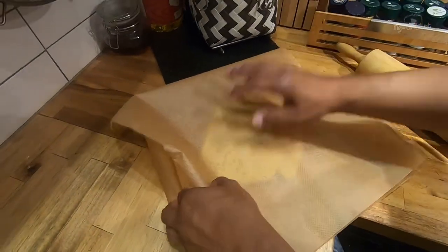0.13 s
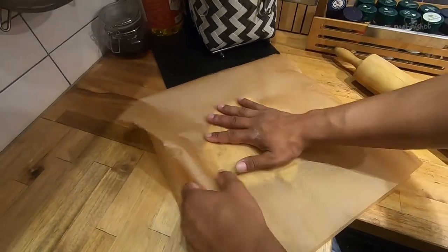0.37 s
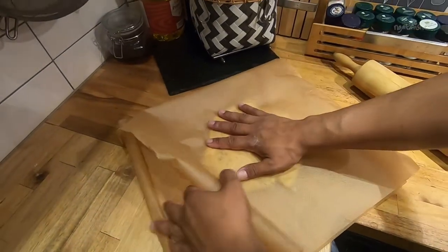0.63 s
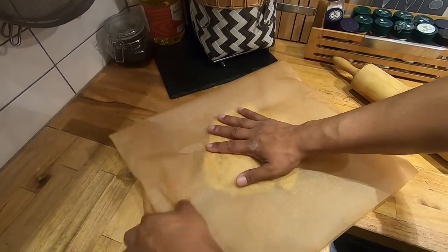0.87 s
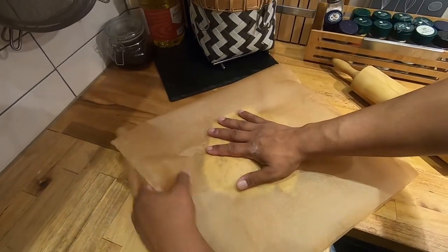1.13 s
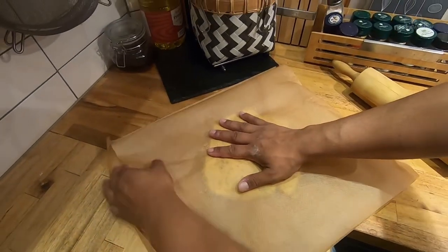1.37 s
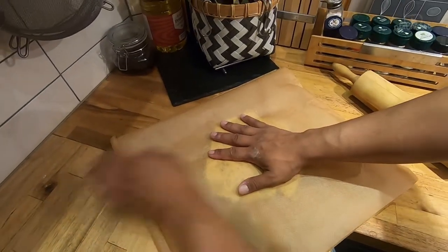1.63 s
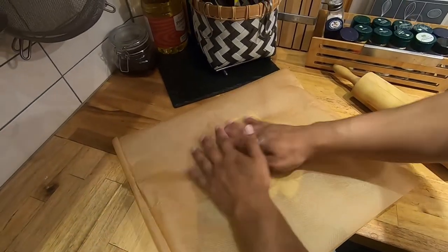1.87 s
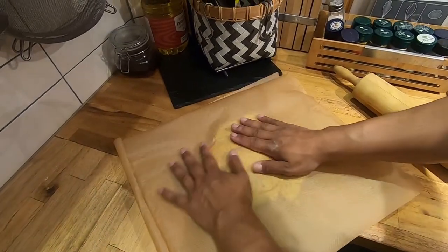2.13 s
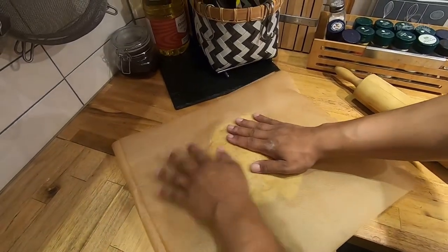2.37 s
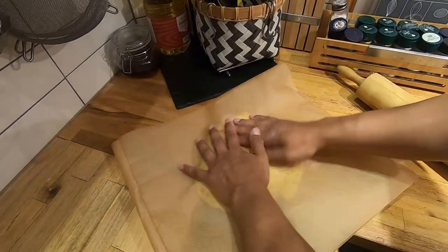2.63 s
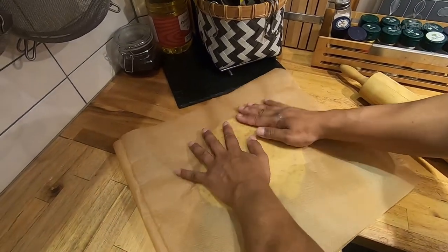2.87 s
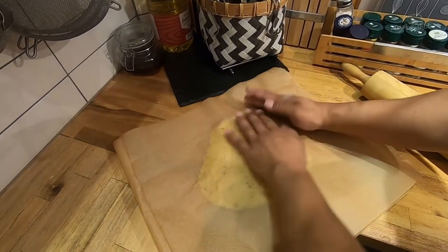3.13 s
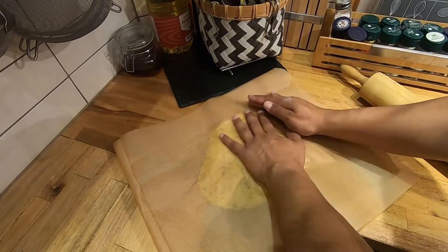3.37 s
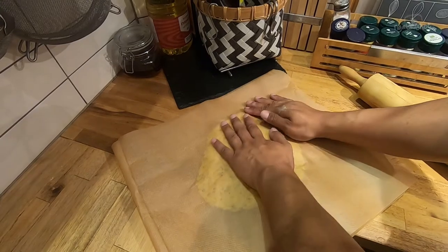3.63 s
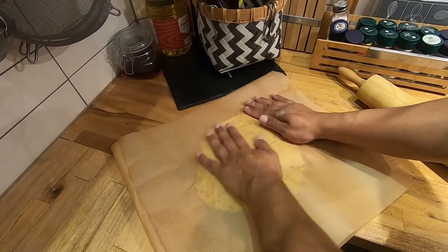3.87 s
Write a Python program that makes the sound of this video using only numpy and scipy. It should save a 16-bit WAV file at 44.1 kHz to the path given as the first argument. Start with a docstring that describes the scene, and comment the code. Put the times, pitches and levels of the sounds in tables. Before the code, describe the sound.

Hands pull and smooth crisp baking paper over dough on a wooden counter; bright snaps and hissing slides come first, then a short pause, a fresh burst and lighter crinkles, with faint thuds and low room hum.

```python
"""A crease snaps at once, close to the microphone, then parchment paper rustles as hands pull and
smooth it over dough on a wooden counter in a tiled kitchen. Dense tiny clicks of buckling and noise
for the sliding hiss share the paper's spectrum; louder creases ring briefly and set off flurries.
Soft thuds are decaying low tones. Behind them lie feedback-delay reverberation, a wavering sine hum
near 47 Hz and a faint room floor of shaped noise."""
import sys
import numpy as np
from scipy import signal
from scipy.fft import rfft, irfft, next_fast_len
from scipy.io import wavfile
from scipy.ndimage import uniform_filter1d

SR = 44100
rng = np.random.default_rng(int(sys.argv[2]) if len(sys.argv) > 2 else 0)


def linear_from_db(decibels):
    """Turn decibels (scalar or array-like) into linear amplitude factors; 0 gives 1."""
    return 10 ** (np.asarray(decibels, float) / 20)


def materialize(psi):
    """Save the field psi as 16-bit PCM at rate SR to the path in sys.argv[1].

    A 1-D psi becomes a single channel; in a 2-D psi each row is a channel.
    """
    bounded = np.clip(np.atleast_2d(psi).T, -1, 1)
    quanta = np.round(bounded * 32767).astype(np.int16)
    wavfile.write(sys.argv[1], SR, quanta)


N = 176400   # 4 s


def rms_one(x):
    """Scale to rms 1."""
    return x / np.sqrt(np.mean(x ** 2) + 1e-20)


def in_time(rows):
    """Columns of a curve over time, one value per sample."""
    times, *columns = np.transpose(rows)
    return [np.interp(np.arange(N) / SR, times, column) for column in columns]


def at_hz(points, hz):
    """Read a spectrum on a log frequency axis."""
    points = np.array(points)
    return np.interp(np.log(hz), np.log(points[:, 0]), points[:, 1])


def drift(rate_hz):
    """Slow chance of spread 1: noise through two equal low-pass poles, drawn at every 20th sample."""
    pole = np.exp(-40 * np.pi * rate_hz / SR)
    noise = rng.standard_normal(N // 20 + 2002)
    slow = signal.lfilter([1], [1, -2 * pole, pole * pole], noise)[2000:]
    return np.interp(np.arange(N) / 20, np.arange(len(slow)), rms_one(slow))


def resonate(x, hz, width_hz):
    """Two-pole resonance, gain 1 on top."""
    r = np.exp(-np.pi * width_hz / SR)
    poles = [1, -2 * r * np.cos(2 * np.pi * hz / SR), r * r]
    return signal.lfilter([(1 - r * r) / 2, 0, (r * r - 1) / 2], poles, x)


# How alike the left and right of the microphone are: (frequency [Hz], likeness [1 = identical])
STEREO_LIKENESS = [(60, 1), (130, 0.68), (290, 1), (640, 0.66), (1410, 0.23), (3100, 1), (6820, 0.037),
                   (15000, 0.01)]
# Balance of the stereo image: (frequency [Hz], left minus right [dB])
STEREO_BALANCE = [(60, 0.5), (130, 0.0), (290, -0.5), (640, -0.5), (1410, -0.5), (3100, 0.0), (6820, -1.0),
                  (15000, 3.0)]
TOP_SHARE = 0.61   # share of the brightness tilt that applies above 3500 Hz


def coloured(pairs, spectrum, tilt_db, patchy_db):
    """Half-octave bands dealt in turn from (mid, side) inputs, each with level, flicker and stereo image."""
    out, edges = 0, 25 * 2 ** np.arange(0, 9.6, .5)
    for k, (low, high) in enumerate(zip(edges, edges[1:])):
        band = signal.butter(2, [low, high], "band", fs=SR, output="sos")
        mid, side = signal.sosfilt(band, pairs[k % len(pairs)])
        side = side * np.std(mid) / np.std(side)
        hz = np.sqrt(low * high)
        alike = np.clip(at_hz(STEREO_LIKENESS, hz), -1, 1)
        lean_db = at_hz(STEREO_BALANCE, hz) / 2 * np.array([[1], [-1]])
        # the tilt is flat from 350 to 900 Hz and absent below
        tilt_share = TOP_SHARE if hz > 3500 else hz > 350
        bright_db = tilt_db * np.log2(max(hz, 900) / 3500) * tilt_share
        flicker_db = patchy_db * (.5 if hz > 7000 else 1) * drift(30.3)
        gain = linear_from_db(at_hz(spectrum, hz) + bright_db + flicker_db)
        stereo = np.sqrt(1 + alike) * mid + np.sqrt(1 - alike) * side * [[1], [-1]]
        out = out + gain * linear_from_db(lean_db) * stereo
    return rms_one(out)


# Spectrum of the room floor: (frequency [Hz], relative level per Hz [dB])
FLOOR_SPECTRUM = [(40, -23), (70, 0), (150, -11), (320, -4), (600, -10.5), (1100, -13), (3000, -18),
                  (7500, -24.5), (11000, -32), (15600, -48)]


def room_floor():
    """Faint stationary noise of the room, shaped in bands that flicker slightly."""
    return linear_from_db(-55) * coloured(rng.standard_normal((2, 2, N)), FLOOR_SPECTRUM, 0, 1.1)


# Swells of the hum at the microphone: (time [s], rms level before smoothing and drift [dB])
HUM_LEVEL = [(0, -44.5), (.12, -55), (.25, -67), (.35, -50), (.43, -55.5), (.62, -45.5), (.86, -65.5),
             (.97, -50), (1.07, -74), (1.17, -48), (1.27, -59), (1.47, -45.5), (1.57, -56.5), (1.66, -46.5),
             (1.84, -65.5), (1.94, -54), (2.19, -70), (2.47, -46), (2.8, -58), (2.95, -55.5), (3.55, -64),
             (4, -53)]
# Slow course of the hum's pitch: (time [s], centre frequency [Hz])
HUM_COURSE = [(0, 47), (.8, 50), (1.1, 44.5), (2.2, 45), (2.4, 49.5)]
HUM_WOBBLE_HZ, HUM_SIDE_DB, HUM_SMOOTH_S = 2, -15, .05


def hum():
    """A low sine that wavers in pitch, swells and fades, with a weak part opposite in left and right."""
    hz = in_time(HUM_COURSE)[0] + HUM_WOBBLE_HZ * drift(5.1)
    phase = 2 * np.pi * np.cumsum(hz) / SR
    level = linear_from_db(in_time(HUM_LEVEL)[0] + 2 * drift(10))
    level = uniform_filter1d(level, size=int(HUM_SMOOTH_S * SR))
    side = linear_from_db(HUM_SIDE_DB) * np.cos(phase + 2 * drift(1.5)) * [[1], [-1]]
    return np.sqrt(2) * level * (np.sin(phase) + side)


KITCHEN_T60_S, WALL_CUT_HZ = 0.32, 27000   # low-frequency decay time; losses grow towards this frequency


def kitchen(x):
    """Eight feedback delays a side with dull walls, evaluated on a frequency grid."""
    size = next_fast_len(N + SR)
    hz = np.arange(size // 2 + 1) * SR / size
    delays_s = rng.uniform(.008, 0.039, (2, 8))
    loss = np.sqrt(1 + (hz / WALL_CUT_HZ) ** 2)
    source = rfft(x.mean(axis=0), size)
    out = []
    for side in delays_s:
        loops = [linear_from_db(-60 * d * loss / KITCHEN_T60_S) * np.exp(-2j * np.pi * hz * d) for d in side]
        response = sum((-1) ** k * g / (1 - g) for k, g in enumerate(loops))
        out.append(irfft(source * response, size)[:N])
    return np.array(out)


# The hand bumps the counter through the dough:
# (time [s], level before onset and decay [dB], pitch [Hz])
COUNTER_BUMPS = [(0.304, -33.5, 167), (0.464, -38, 168), (1.328, -44.5, 266), (1.915, -42, 85),
                 (3.059, -43, 225), (3.347, -48.5, 148)]
KNOCK_T60_S, KNOCK_ATTACK_S = .16, .006


def knocks():
    """Soft low thuds of the wooden top: a decaying tone and a weaker one an octave below."""
    out, t = np.zeros(N + 9000), np.arange(9000) / SR
    for s, db, hz in COUNTER_BUMPS:
        shape = (1 - np.exp(-t / KNOCK_ATTACK_S)) * linear_from_db(db - 60 * t / KNOCK_T60_S)
        tone = np.sin(2 * np.pi * hz * t) + 0.54 * np.sin(np.pi * hz * t)
        i = int(s * SR)
        out[i:i + 9000] += shape * tone
    return out[:N]


# Single creases, close to the microphone, each followed by a dying flurry of clicks: (flurry start [s],
# snap level [dB], pitch [Hz], flurry level before FLURRY_DB [dB], flurry decay by 60 dB [s])
CREASE_SNAPS = [(0.0187, -18.5, 3150, -26, 0.16), (0.141, -32, 2480, -30.5, 0.041),
                (0.1621, -14, 2870, -14.5, 0.07), (0.2025, -19.5, 2630, -20.5, 0.066),
                (0.2428, -19.5, 2000, -21, 0.07), (0.249, -25, 2450, -14, 0.084),
                (0.2684, -29, 2980, -18, 0.039), (0.3014, -16, 2600, -12.5, 0.18),
                (0.3117, -15, 3040, -19, 0.098), (0.4346, -23, 1710, -22.5, 0.09),
                (0.4424, -27.5, 1540, -18, 0.18), (0.4534, -20, 2470, -18.5, 0.059),
                (0.519, -19, 3300, -16.5, 0.12), (0.6535, -11, 2980, -21.5, 0.088),
                (0.753, -13.5, 2830, -20, 0.078), (0.8705, -15.5, 3830, -16.5, 0.061),
                (1.1326, -20, 3900, -21, 0.095), (1.1482, -20, 3700, -14, 0.11),
                (1.241, -31, 3000, -13.5, 0.035), (1.6165, -35, 3530, -18.5, 0.09),
                (1.7716, -48, 7460, -32, 0.033), (1.8083, -24.5, 4170, -30, 0.038),
                (1.8596, -11, 3760, -22.5, 0.12), (1.8944, -11.5, 3200, -17, 0.11),
                (2.011, -16.5, 2950, -26, 0.07), (2.356, -23.5, 2980, -27.5, 0.071),
                (2.429, -22.5, 5000, -30, 0.062), (2.5515, -31, 3230, -30, 0.12),
                (2.5604, -26, 4070, -31, 0.059), (2.5731, -15, 3380, -21, 0.062),
                (2.6261, -17, 4400, -27, 0.04), (2.6433, -18, 3900, -22, 0.08),
                (2.6651, -16, 3400, -26, 0.05), (2.9084, -24, 3200, -26, 0.058),
                (2.9357, -21, 3960, -27, 0.093), (3.0326, -22, 3830, -30, 0.061),
                (3.0687, -22, 3100, -29, 0.045), (3.0815, -22.5, 2980, -19.5, 0.076),
                (3.167, -31, 4500, -23.5, 0.054), (3.2075, -15, 3100, -28, 0.07),
                (3.237, -22, 2700, -34, 0.054), (3.3155, -25, 6400, -31, 0.05),
                (3.3326, -24.5, 6660, -21.5, 0.083), (3.4146, -26, 3100, -27, 0.05),
                (3.4587, -26, 1500, -33, 0.099), (3.4685, -28, 3640, -31, 0.07),
                (3.5273, -30, 3180, -36, 0.048), (3.5542, -21, 2500, -35, 0.05),
                (3.5902, -17, 2700, -33, 0.1), (3.7481, -25, 2050, -36, 0.059),
                (3.7675, -24, 2700, -27, 0.066), (3.9445, -25, 2560, -33, 0.07),
                (3.9687, -27, 2250, -25.5, 0.049)]
# Returns off counter and wall: (nominal delay [s], level relative to the snap [dB])
COUNTER_WALL_ECHOES = [(.0013, -6), (.0024, -7), (.0068, -10), (.0084, -14)]
SNAP_DELAY_S = .0018   # from the start of the flurry to the envelope's peak
SNAP_LAG_SAMPLES = 0.45   # largest lag of the right side, before rounding to a sample
SNAP_CYCLES = 1.1   # cycles from start to peak
SNAP_OVERTONE, SNAP_OVERTONE_DB = 1.85, -11   # upper mode: frequency ratio and level
RATTLE_DB, RATTLE_T60_S, RATTLE_WIDTH = -19, .035, .45   # width as a share of the pitch


def snaps():
    """Each snap swells and dies within a few cycles, rattles on and comes back off counter and wall."""
    out, t = np.zeros((2, N + 4000)), np.arange(2400) / SR
    chance = rng.random((len(CREASE_SNAPS), 5))
    for (s, db, hz, _, _), u in zip(CREASE_SNAPS, chance):
        age = t * hz / SNAP_CYCLES
        turns = 2 * np.pi * (hz * t + u[0])
        tone = np.sin(turns) + linear_from_db(SNAP_OVERTONE_DB) * np.sin(SNAP_OVERTONE * turns)
        ring = tone * (age * np.exp(1 - age)) ** 2
        rattle = rms_one(resonate(rng.standard_normal((2, 2400)), hz, RATTLE_WIDTH * hz))
        rattle = rattle * linear_from_db(RATTLE_DB - 60 * t / RATTLE_T60_S)
        for ch in range(2):
            i = int((s + SNAP_DELAY_S - SNAP_CYCLES / hz) * SR + ch * SNAP_LAG_SAMPLES * u[0])
            side_rattle = rattle[0] + .5 * (1 - 2 * ch) * rattle[1]
            out[ch, i:i + 2400] += linear_from_db(db) * (ring + np.minimum(age, 1) * side_rattle)
            for (delay, echo_db), v in zip(COUNTER_WALL_ECHOES, u[1:]):
                j = i + int(delay * SR * (.95 + .1 * v + .02 * ch))
                out[ch, j:j + 2400] += linear_from_db(db + echo_db) * ring
    return out[:, :N]


# How hard the paper is worked, close to the microphone:
# (time [s], rustle level without flurries [dB], brightness [dB per octave])
PAPER_MOTION = [(0, -43, -4.5), (.03, -35.5, -3.5), (.08, -34, -2.5), (.13, -46, -3), (.16, -31.5, -3.5),
                (.23, -34.5, -2.5), (.29, -29.5, -2), (.36, -30.5, -2.5), (.42, -34, -3),
                (.49, -30.5, -2.5), (.53, -26.5, -3), (.58, -27, -1), (.69, -23, 0), (.73, -23, -0.5),
                (.79, -21.5, -0.5), (.86, -25, -2.5), (.92, -25.5, 2.5), (.96, -33, -0.5), (1.08, -29, 0.5),
                (1.11, -33.5, -0.5), (1.17, -26.5, 1), (1.21, -32.5, 1), (1.26, -25.5, -1),
                (1.35, -20, -1.5), (1.42, -24.5, 2), (1.5, -24, 2), (1.6, -38, 0.5), (1.64, -38.5, 1.5),
                (1.68, -45, -1), (1.74, -55, -1.5), (1.828, -45.5, -0.5), (1.842, -21.5, -0.5),
                (1.9, -22, 1.5), (1.96, -28, 0.5), (2.05, -32, 0.5), (2.19, -31.5, 3), (2.23, -34.5, -1),
                (2.32, -36.5, 0.5), (2.44, -42.5, 1), (2.545, -51.5, -2), (2.575, -29.5, 0),
                (2.64, -29, -0.5), (2.71, -30.5, -0.5), (2.81, -25.5, 1.5), (2.845, -35.5, -0.5),
                (2.9, -42, -2), (2.95, -41.5, 0), (3.02, -46.5, -3), (3.045, -31.5, -1.5), (3.13, -37, 4.5),
                (3.2, -36.5, -1.5), (3.25, -39, -0.5), (3.3, -48, 0), (3.35, -45.5, 1.5), (3.4, -54, 3.5),
                (3.45, -43.5, 1), (3.49, -43.5, 3), (3.52, -46, -1), (3.62, -42, -0.5),
                (3.685, -45.5, -1.5), (3.78, -37, 1), (3.9, -38, -0.5), (4, -34, 1)]
FLURRY_DB, FLURRY_ATTACK_S = -4.5, 0.001   # trim and onset of all flurries


def activity():
    """Rustle gain: the slow motion plus the flurry after each snap, summed as power."""
    power, t = linear_from_db(2 * in_time(PAPER_MOTION)[0]), np.arange(N) / SR
    for s, _, _, flurry_db, t60 in CREASE_SNAPS:
        i = int(s * SR)
        age = t[i:i + 12000] - s + 1e-4
        decay = linear_from_db(flurry_db + FLURRY_DB - 60 * age / max(t60, .005))
        power[i:i + 12000] += (decay * (1 - np.exp(-age / FLURRY_ATTACK_S))) ** 2
    return np.sqrt(power)


POPS_PER_S, POP_DB = 200, -12.5   # level relative to the rustle gain
POP_LOW_HZ, POP_HIGH_HZ, POP_WIDTH_HZ = 1450, 3860, 960   # width of the first of two resonances


def pops(gain, tilt_db):
    """Sparse middling creases ring briefly at one of eight pitches; brighter strokes favour the high ones."""
    sizes = linear_from_db(4.2 * np.minimum(rng.exponential(1, N), 3)) * rng.choice([-1, 1], N)
    sizes = sizes * (rng.random(N) < POPS_PER_S / SR)
    pitch_index = rng.integers(0, 8, N)
    pan_db = rng.normal(0, 4.3, N)   # left minus right
    sides = sizes * linear_from_db(pan_db * np.array([[.5], [-.5]]))
    rings = []
    for k, hz in enumerate(np.geomspace(POP_LOW_HZ, POP_HIGH_HZ, 8)):
        struck = resonate(sides * (pitch_index == k) + 1e-18, hz, POP_WIDTH_HZ)
        rings.append(resonate(struck, hz, 2 * POP_WIDTH_HZ) * linear_from_db(tilt_db * np.log2(hz / 3500)))
    return linear_from_db(POP_DB) * gain * rms_one(sum(rings))


# Colour of the sheet, heard close: (frequency [Hz], relative level per Hz [dB])
PAPER_SPECTRUM = [(59, -35), (100, -24), (156, -17.5), (197, -18), (287, -16.5), (669, -18.5), (1340, -8.5),
                  (1490, -8.5), (3130, -4), (8990, -7), (13400, -45.5), (15600, -80)]
GRAINS_PER_S, GRAIN_SPREAD_DB = 2500, 2.5   # buckling creases: rate at the median gain, spread of sizes
CLUMP_DB, CLUMP_PER_S = 3, 40   # depth and speed of the rate's wander
RATE_FOLLOWS = .4   # share of the level swing that the grain rate follows
GRAIN_DB, SLIDE_DB, SLIDE_PATCHY_DB = -0.5, -6.5, 2   # clicks against hiss; flicker of the bands
SCATTER_S = 0.0032   # decay constant of the smear that sets the two sides apart


def rustle():
    """Clumped clicks of uneven size and sliding hiss, both coloured by the sheet, plus middling creases."""
    gain, tilt_db = activity(), in_time(PAPER_MOTION)[1]
    busy = GRAINS_PER_S * (gain / np.median(gain)) ** RATE_FOLLOWS
    rate = busy * linear_from_db(CLUMP_DB * drift(CLUMP_PER_S))
    sizes = linear_from_db(GRAIN_SPREAD_DB * np.minimum(rng.exponential(1, (3, N)), 4))
    sizes = sizes * rng.choice([-1, 1], (3, N))
    # dividing by the root of the rate leaves the level to the gain
    clicks = sizes * (rng.random((3, N)) < rate / SR) / np.sqrt(busy)
    smear = rng.standard_normal(600) * np.exp(-np.arange(600) / (SCATTER_S * SR))
    pairs = []
    for mid in clicks:
        side = signal.fftconvolve(mid * rng.choice([-1, 1], N), smear)[:N]
        grains = linear_from_db(GRAIN_DB) * np.array([rms_one(mid), rms_one(side)])
        slide = linear_from_db(SLIDE_DB) * rng.standard_normal((2, N))
        pairs.append(gain * (grains + slide))
    sheet = coloured(pairs, PAPER_SPECTRUM, tilt_db, SLIDE_PATCHY_DB)
    return np.sqrt(np.mean(gain ** 2)) * sheet + pops(gain, tilt_db)


def scene():
    """Paper close to the microphone, the room behind it."""
    paper = rustle() + snaps() + knocks()
    reverberation = linear_from_db(-18) * kitchen(paper)
    return paper + reverberation + hum() + room_floor()


def top_cut(x):
    """Nothing passes above the cut-off."""
    return signal.sosfilt(signal.butter(12, 15720, fs=SR, output="sos"), x)


def record(dry):
    """Overload rounds the peaks smoothly towards a ceiling."""
    ceiling = .48   # of full scale
    mix = ceiling * np.tanh(dry / ceiling)
    return top_cut(mix)


dry = scene()
out = record(dry)
materialize(out)
```